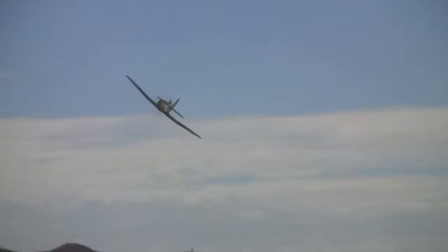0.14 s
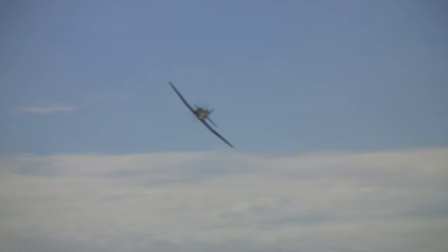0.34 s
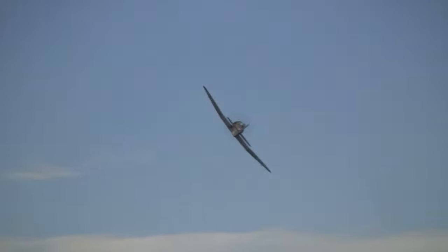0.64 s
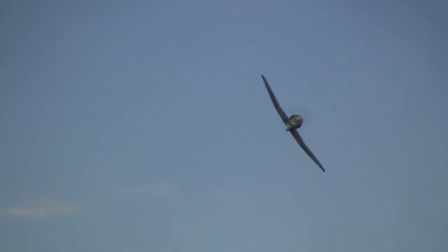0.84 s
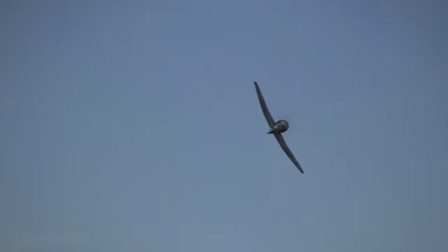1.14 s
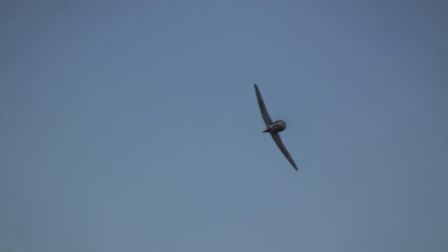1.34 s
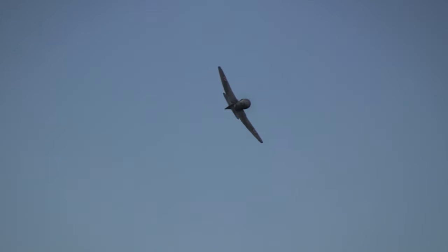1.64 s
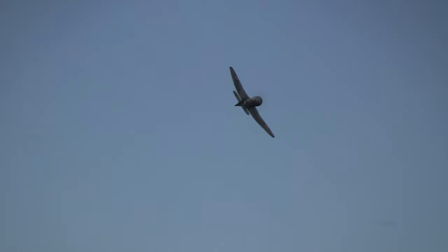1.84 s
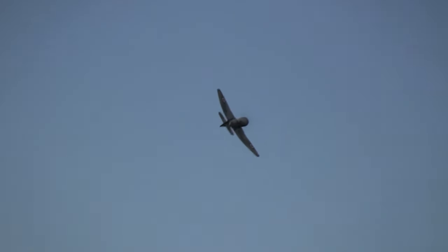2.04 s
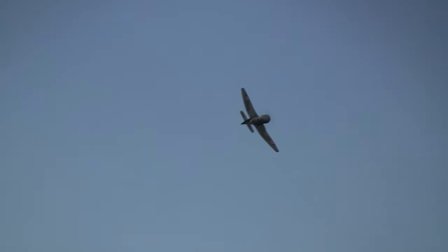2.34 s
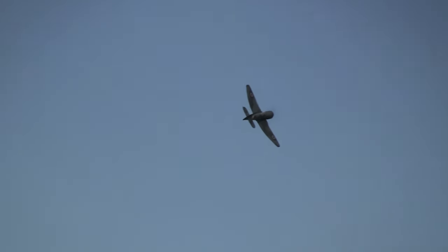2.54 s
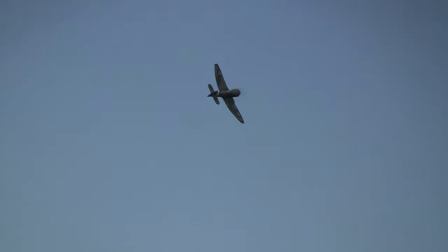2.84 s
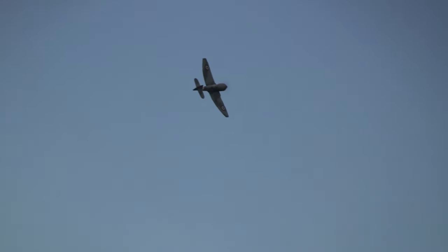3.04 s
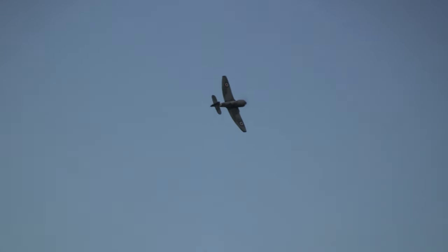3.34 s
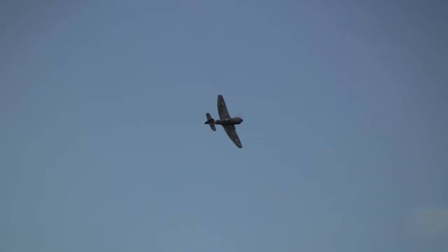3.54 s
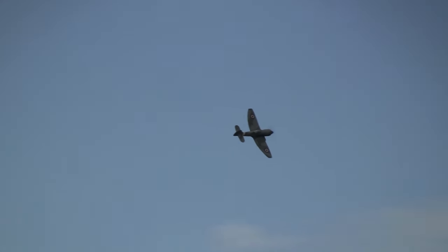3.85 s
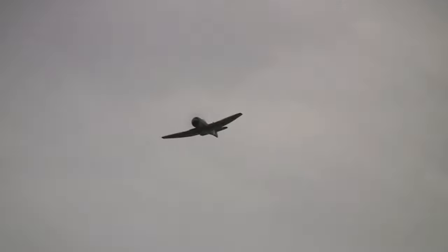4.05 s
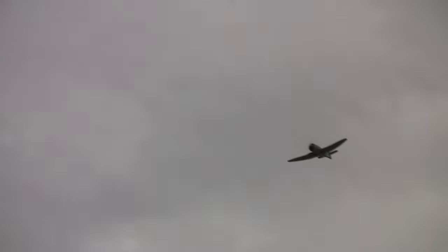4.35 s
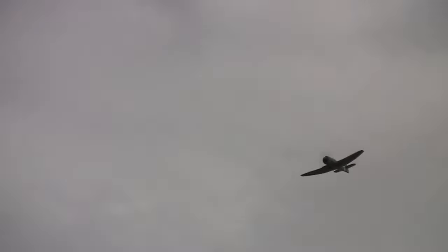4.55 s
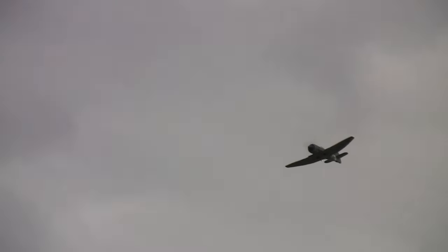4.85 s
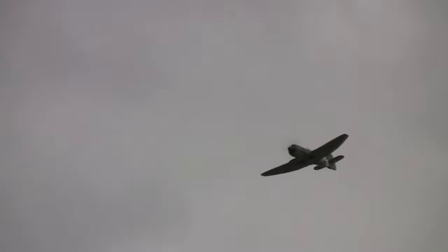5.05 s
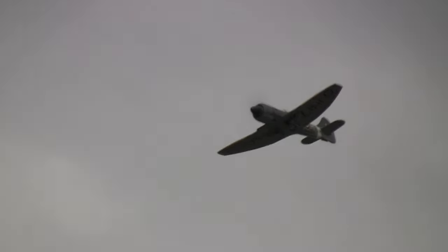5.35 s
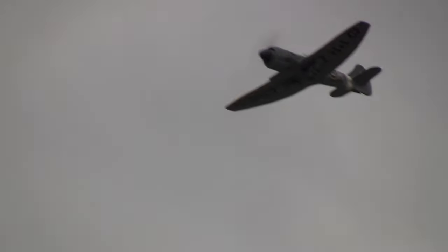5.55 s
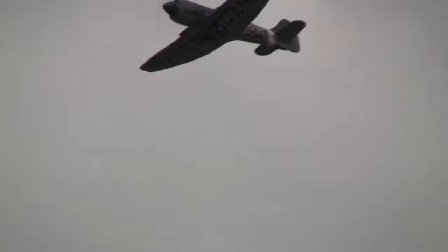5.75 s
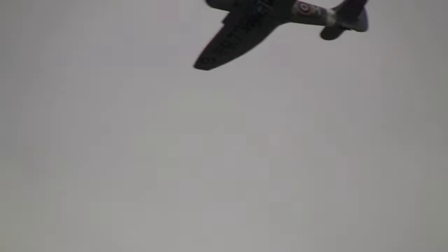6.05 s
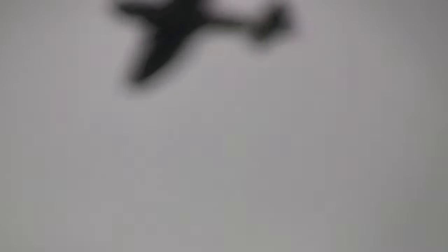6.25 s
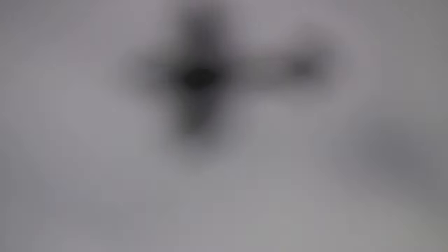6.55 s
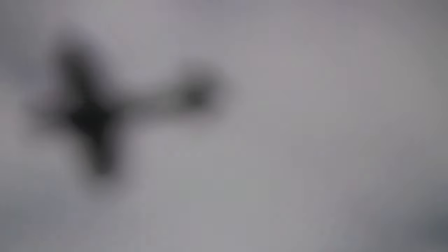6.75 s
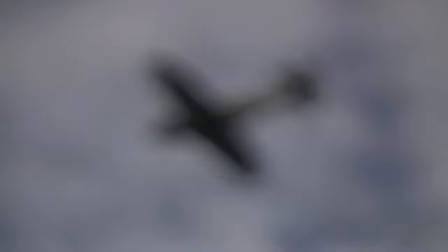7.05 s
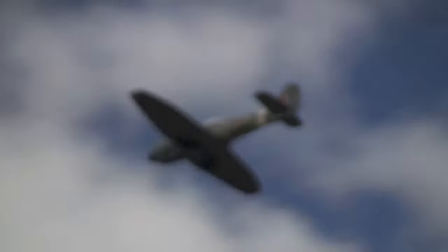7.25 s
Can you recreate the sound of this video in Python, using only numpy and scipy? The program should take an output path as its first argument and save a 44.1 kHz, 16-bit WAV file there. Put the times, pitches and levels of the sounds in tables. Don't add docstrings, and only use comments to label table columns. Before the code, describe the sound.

Raspy piston-engine buzz of a big model plane recedes, camera clicks, a quick fade through silence, then a louder pass sinks in pitch.

```python
import sys
import numpy as np
from scipy import signal
from scipy.fft import rfft, irfft, next_fast_len
from scipy.io import wavfile
from scipy.ndimage import uniform_filter1d, map_coordinates

SR = 44100
rng = np.random.default_rng(int(sys.argv[2]) if len(sys.argv) > 2 else 0)


def wav_out(sig):
    wavfile.write(sys.argv[1], SR, np.round(np.clip(np.atleast_2d(sig).T, -1, 1) * 32767).astype(np.int16))


def makeup_ratio(level_db):
    decades = np.asarray(level_db, float) / 20
    return 10 ** decades


N = 325899
T = np.arange(N) / SR
CUT_S = 4.029

# (time [s], engine cycle rate [Hz], delay of the ground echo [ms])
AWAY_PATH = [(0, 35.45, .99), (.7, 35.05, 1.14), (1.3, 35.0, 1.27), (2.6, 34.96, 1.39), (3.5, 34.97, 1.47),
             (4.1, 34.98, 1.49)]
OVER_PATH = [(4.0, 34.8, 3.2), (4.65, 34.8, 3.74), (4.95, 35.41, 4.08), (5.25, 36.02, 4.45),
             (5.55, 36.31, 4.94), (6.0, 35.7, 5.72), (6.3, 34.46, 6.24), (6.55, 33.42, 6.6),
             (6.75, 32.79, 6.72), (7.0, 32.02, 6.6), (7.25, 31.36, 6.4), (7.4, 31.26, 6.15)]


def level(x, db):
    return x * makeup_ratio(db) / np.sqrt(np.mean(x ** 2))


def curves(table):
    s, *columns = np.transpose(table)
    return [np.interp(T, s, column) for column in columns]


def colour(x, spectrum):
    hz, db = np.transpose(spectrum)
    size = next_fast_len(N + SR // 10)
    f = np.fft.rfftfreq(size, 1 / SR) + 1
    gain = makeup_ratio(np.interp(np.log(f), np.log(hz), db))
    return irfft(rfft(x, size) * gain, size)[:N]


def band(x, lo_hz, hi_hz):
    sos = signal.butter(2, [lo_hz, min(hi_hz, 0.45 * SR)], "band", fs=SR, output="sos")
    return signal.sosfilt(sos, x)


def bump(s, width):
    return np.exp(-((T - s) / width) ** 2)


def walk(rate):
    hop = 32
    k = int(SR / rate / hop)
    steps = np.repeat(rng.standard_normal(N // hop // k + 2), k)
    coarse = uniform_filter1d(uniform_filter1d(steps, k), k)
    return 2.0 * np.interp(np.arange(N) / hop, np.arange(len(coarse)), coarse)


def each(turns):
    return rng.standard_normal(2000)[turns.astype(int)]


def wind():
    # (time [s], hold [s], level [dB], dying away [dB/s])
    gusts = [
        (0, 0.031, -37, 70),
        (0.79, 0.045, -29.5, 402),
        (4.114, 0.047, -21.5, 30),
        (4.396, .08, -22, 120),
        (4.785, 0.16, -21, 130),
        (5.137, 0.66, -24.5, 67),
        (6, 0.036, -23.5, 14),
        (6.8, 0.72, -26.5, 50),
    ]
    # (frequency [Hz], level [dB per Hz])
    field_spectrum = [(40, -21), (65, -11), (85, 2.5), (110, -14), (300, -21), (1000, -24), (3000, -41.5),
                      (6000, -51), (15000, -54), (15700, -63)]
    rise_db_s = 162
    buffets = [np.where(T < CUT_S, -51, -27.5)]
    for s, hold, db, dies in gusts:
        rising = rise_db_s * np.clip(s - T, 0, None)
        dying = dies * np.clip(T - s - hold, 0, None)
        buffets.append(db - rising - dying)
    gust_db = np.max(buffets, axis=0)
    port = band(band(rng.standard_normal(N), 199, 279), 151, 322)
    eddies = makeup_ratio(0.62 * walk(rate=20)) * port
    field = makeup_ratio(0.88 * walk(rate=4.63)) * colour(rng.standard_normal(N), field_spectrum)
    field_db = np.interp(T, [1.2, 3.5], [-3, 1.5])
    return level(eddies, -1.33) * makeup_ratio(gust_db) + level(field, -44) * makeup_ratio(field_db)


def camera():
    # (time [s], peak [dB], ring from [Hz], ring to [Hz], thud [dB], knock over the thud [dB])
    clicks = [
        (.768, -47, 1000, 4030, -29, 8),
        (1.5478, -48, 6900, 13100, -72, 0),
        (1.6285, -8.5, 2550, 7460, -21.5, -1),
        (1.6307, -24, 2600, 6000, -70, 0),
        (2.64, -62, 6000, 9000, -42, 0),
        (2.702, -37, 2500, 3500, -58, 0),
        (2.956, -51, 5500, 11000, -72, 0),
        (3.27, -58, 3500, 5500, -64, 0),
        (5.69, -45, 2022, 4000, -23, -12),
    ]
    length = 4410
    out, t = np.zeros(N + length), np.arange(length) / SR
    for s, db, lo_hz, hi_hz, thud_db, knock_db in clicks:
        crack, knock = rng.standard_normal((2, length))
        ring = level(band(crack, lo_hz, hi_hz), -4.5)
        ring = ring + 0.4 * np.sin(2 * np.pi * 0.86 * lo_hz * t)
        ring = ring + 1.15 * np.sin(2 * np.pi * 1.276 * lo_hz * t)
        ring = ring + 0.67 * np.sin(2 * np.pi * 0.5 * (lo_hz + hi_hz) * t)
        ring = ring + makeup_ratio(db / 2) * 1.8 * crack * np.exp(-t / 0.001)
        decay = np.exp(-t / 0.00076) + 0.2 * np.exp(-t / 0.0017)
        tick = makeup_ratio(db) * ring * (1 - np.exp(-t / 0.00025)) * decay
        rumble = band(band(knock, 100, 390), 60, 800) * np.clip(t / 0.011, 0, 1) ** 2 * np.exp(-t / 0.02)
        body = 0.72 * np.sin(2 * np.pi * 65 * t) + 13 * makeup_ratio(knock_db) * rumble
        thud = makeup_ratio(thud_db) * body * (t / 0.017) ** 2 * np.exp(2 - 2 * t / 0.012)
        start = int(s * SR)
        out[start:start + length] += tick + thud
    return out[:N]


def overtones():
    # (multiple of the cycle, time [s], width [s], level [dB])
    singing = [(45.9, .95, 0.64, -49), (46, 3, 1.1, -59), (49, 1.8, 1.4, -54), (52, 2.6, 1.4, -65),
               (57, 3.6, .9, -56.5), (57, 1.9, .8, -67), (58, 2.2, .7, -66), (56.3, 4.9, .4, -52),
               (56, 4.7, .3, -53), (58, 5.5, .3, -50), (58, 6, .4, -55), (56, 6.85, .2, -46),
               (46.6, 5.2, .15, -46)]
    hz = np.where(T < CUT_S, curves(AWAY_PATH)[0], curves(OVER_PATH)[0])
    cycle = 2 * np.pi * np.cumsum(hz) / SR
    out = 0
    for k, s, width, db in singing:
        out = out + makeup_ratio(db) * bump(s, width) * np.sin(k * cycle + 0.4 * walk(rate=20))
    return out


def whistles(cycle):
    # (time [s], length [s], multiple of the cycle, level [dB])
    tones = [
        (1.354, 0.12, 10, -40),
        (6.623, 0.056, 117.7, -41),
        (6.76, .06, 117.5, -49),
        (7.034, 0.07, 91.6, -38.5),
    ]
    out = 0
    for s, length, k, db in tones:
        shake = 1.1 * min(k / 90, 1) ** 2 * walk(rate=60)
        out = out + makeup_ratio(db) * np.exp(-((T - s) / length) ** 4) * np.sin(k * cycle + shake)
    return out


def cowling(cycle, rattle_db):
    low = level(band(rng.standard_normal(N), 1000, 1180), 1.5) * ((1 - np.cos(cycle / 2 - 0.2)) / 2) ** 5
    strength = makeup_ratio(3.5 * each(cycle / (2 * np.pi) + 0.57))
    knock = strength * ((1 + np.cos(cycle + 0.42)) / 2) ** 3
    high = knock * np.sin(59 * cycle + 1.23 * walk(rate=150)) * makeup_ratio(-0.5)
    return (low + high) * makeup_ratio(rattle_db)


def propeller(cycle, roar_db, treble_db, bass_db, gate, burst):
    # (frequency [Hz], level [dB per Hz])
    roar_spectrum = [(60, -47), (110, -12.5), (180, -8.5), (350, -16.5), (600, -17.5), (1300, -20),
                     (2000, -23.5), (4200, -31), (5900, -38), (7500, -47), (9500, -51.5), (11900, -58),
                     (13500, -58.5), (15700, -63.5)]
    firing = np.cos(5 * cycle) + 0.25 * np.cos(cycle + 0.4)
    firing = firing + 0.18 * each(5 * cycle / (2 * np.pi) + 0.5)
    size = next_fast_len(N)
    noise = rfft(level(colour(rng.standard_normal(N), roar_spectrum), 0), size)
    octave = np.log2(np.fft.rfftfreq(size, 1 / SR) + 1)
    shared, out = walk(rate=7.3), 0
    for hz in 62.5 * 2 ** np.arange(0, 8.5, 0.5):
        share = np.clip(1 - 2 * abs(octave - np.log2(hz)), 0, 1)
        gain_db = treble_db * (min(hz / 5600, 1.8) ** 1.04 - 0.3) + bass_db * (hz < 200)
        depth = gate * np.clip(hz / 3000, 0.5, 1.5)
        puff = np.exp(depth * firing - 0.8 * depth ** 2)
        flicker_db = 0.32 * shared + 0.25 * walk(rate=13)
        out = out + puff * makeup_ratio(gain_db + flicker_db) * irfft(noise * share, size)[:N]
    return out * makeup_ratio(roar_db)


def exhaust(cycle, orders, swells, lobes, turn, weak_db, hum_db, bark_db, rough, burst, hush):
    pipe_late = [(1, -.56), (22, .11), (23, .62), (33, .84), (34, .36), (44, .54)]
    top_order, sub_db_per_order = 44, 10
    hum, bark, wobble = 0, 0, walk(rate=9.9)
    strong = {k: rest for k, *rest in orders}
    first, second = (bump(s, width) for s, width in lobes)
    whole = np.arange(1, top_order + 1)
    late = 2 * np.pi * np.cumsum(np.interp(whole, *np.transpose(pipe_late)))
    for k in sorted({*whole, *strong}):
        sweep = np.interp(k, whole, late) + 32.4
        shake = rough * np.sqrt(k / 19) * walk(rate=20)
        phase = k * (cycle + 0.01 * rough * wobble) - sweep + shake
        faint_db = weak_db - sub_db_per_order * max(4 - k, 0)
        before_db, after_db, first_db, second_db = strong.get(k, [faint_db, faint_db, 0, 0])
        facing_db = before_db + (after_db - before_db) * turn + first_db * first + second_db * second
        for order, s, width, db in swells:
            if order == k:
                facing_db = facing_db + db * bump(s, width)
        partial = -np.sqrt(2) * makeup_ratio(facing_db + 3 * rough * walk(rate=5)) * np.cos(phase)
        if k <= 11:
            hum = hum + partial
        else:
            bark = bark + partial
    bark = bark * (1 + burst * np.cos(cycle)) * (1 + 1.6 * burst * np.cos(cycle / 2 - 0.5))
    bark = bark * (1 - hush * ((1 + np.cos(cycle - 2 * np.pi * 0.65)) / 2) ** 3)
    return hum * makeup_ratio(hum_db) + bark * makeup_ratio(bark_db)


def aircraft(path, flight, turning, beam, orders, swells, lobes, bass_db, weak_db, rough, gate, burst, ground,
             bark_shift_db, rattle_db, hush):
    (hz, lag_ms), (turn,) = curves(path), curves(turning)
    rough, ground, gate = (before + (after - before) * turn for before, after in (rough, ground, gate))
    closest_s, closest_m, speed, near_db, db_per_m, leaving = flight
    along = speed * (T - closest_s)
    metres = np.hypot(closest_m, np.where(along < 0, along, leaving * along))
    roar_db = -3.5 - 20 * np.log10(metres)
    beam_db = []
    for before, after, at, width, lobe_db in beam:
        lobe = np.exp(-((turn - at) / width) ** 2)
        beam_db.append(roar_db + before + (after - before) * turn + lobe_db * lobe)
    hum_db, bark_db = beam_db
    treble_db = near_db + 1.5 * turn - db_per_m * metres
    cycle = 2 * np.pi * (np.cumsum(hz) / SR + 0.3)
    direct = exhaust(cycle, orders, swells, lobes, turn, weak_db, hum_db - 4.5, bark_db + bark_shift_db,
                     rough, burst, hush)
    direct = direct + propeller(cycle, roar_db + 4.5, treble_db, bass_db, gate, burst)
    direct = direct + cowling(cycle, roar_db + rattle_db - 13 * (1 - turn))
    soft = signal.sosfilt(signal.butter(1, 3300, fs=SR, output="sos"), direct)
    echo_ms = lag_ms - 0.035 + 0.012 * walk(rate=30)
    arrival = np.arange(N) - echo_ms * SR / 1000
    echo = ground * map_coordinates(soft, [arrival], order=1, mode="nearest")
    return direct + echo + whistles(cycle)


def scene():
    # (closest time [s], closest distance [m], speed [m/s], treble near by [dB],
    # treble lost [dB/m], share of the speed that leads away afterwards [0-1])
    away_flight = (-0.8167, 7, 46, 6.5, 0.1585, 1)
    over_flight = (6.087, 23.1, 27.5, 7.14, 0.26, 0.39)
    # (time [s], share [0-1])
    away_turn = [(0, 0.5), (.6, 0.08), (1.5, 0.44), (3.6, 0.92)]
    over_turn = [(4.1, 0.01), (5.8, 0.2), (6.4, 0.73), (7.0, 0.96)]
    # (before the turn [dB], after it [dB],
    # lobe at share of the turn [0-1], lobe width [0-1], lobe level [dB])
    away_beam = [(9, 20, 0.41, 0.26, -3.5), (3.5, 10, 0.61, 0.3, 7)]
    over_beam = [(6.5, 11.9, 0.012, 0.047, -6), (-4, 5.9, .01, 0.042, -6)]
    # (multiple of the cycle, before the turn [dB], after it [dB],
    # extra in the first lobe [dB], extra in the second lobe [dB])
    away_orders = [(4, -15.5, -13.5, 7.5, -6), (5, 2.5, 3, -2, -1), (6, -28.5, -11, -3, -1),
                   (7, -12.5, 3.5, -2.5, 0), (10, -3, -13, 0, -2), (12, -5.5, -12.5, -11, -2.5),
                   (13, -13, -18.5, 6, 7), (14, -17, -46, 3, 7), (15, -7, -6, -6, 1.5),
                   (16, -20, -7, -3, -3), (17, 3, -18, -0.5, -1), (18, -49, -16, -8, -4),
                   (19, -5.5, -7, -1, 1), (20, -16, -4, -17, 0.5), (21, -21.5, -20, -6, 7.5),
                   (22, -19.5, -12, -2, -7), (23, -31, -2.5, -3, 3), (24, -40, -0.5, 8.5, -4),
                   (25, -15, -24, 2, 3.5), (26, -9, -34, 9.5, -3), (27, -7, -37, 8, -2),
                   (28, -8.5, -17, 3.5, 1.5), (29, -23, -40, -5, 7), (30, -11.5, -36, 6, -6),
                   (31, -26, -36, 0, 13), (32, -15, -32, 3, -2.5), (33, -25, -21.5, -4, 4),
                   (34, -17, -24.5, 0, -2.5), (35, -27, -20, -2, 1), (36, -23, -17, 0, -4),
                   (37, -30, -18, -3, 0), (38, -39, -12, -10, -7), (40, -39, -17, -5, -4),
                   (41, -42, -9, -4, 2), (42, -33, -21, 8, -1)]
    over_orders = [(3, -14.5, -22, 2, -6), (4, -4.5, -13, -5, -1), (4.5, -8, -19.5, -8, -3),
                   (5.002, 2.5, -0.1, 1, 1), (5.483, -7.5, -9, -3, 1.5), (7, -2, -4, -15, -2),
                   (8, -16.5, -0.5, -1, 1), (10, -21, -11, 12, 1.5), (12, -12.5, -3.5, 1, 5.5),
                   (14, -20, -18, 0.5, 8.5), (15, -21, -13.5, 6.5, 5), (16, -18, -7.5, -1, 6),
                   (17, -17, -13, 0, 4), (18, -27, -25, -4, 8), (20, -15.5, -9.5, 1, 3),
                   (21, -26, -12.5, 2, 4), (22, -4.5, -12, 8, 3), (24, -26, -11.5, 9, 2),
                   (25, -11, -7.5, 13.5, 3), (26, -7.5, -21, 7, 9), (27, -18.5, -14.5, 11, 6),
                   (28, -27, -22.5, 2, 9), (29, -14, -15, -10, -6), (30, -4.5, -17, -3, -5),
                   (31, -6, -13, -6, 1), (32, -1, -6.5, 2, -7), (33, -20, -13, 10, 1),
                   (34, -5.5, -19, 3, -4), (35, -11.5, -11, -2, 6), (37.86, -19, -7, 1, 2.5),
                   (38.9, -8.5, -15, 0, 8), (39.9, -20, -12, -4, 1), (43.3, -30, -14, 0, 0)]
    # (multiple of the cycle, time [s], width [s], level [dB])
    away_swells = [(6, .2, .3, 4), (6, 2.5, .6, 7), (7, 0.61, .4, -8), (7, 2.3, 0.43, 2), (16, .6, .5, 2),
                   (16, 2, .4, -6), (17, 3.5, 0.65, 4.5), (19, 1.95, .3, 2), (19, 3.75, .3, -7),
                   (20, 1.95, 0.33, 3.5), (20, 3.5, .3, -6), (21, 2.5, 0.66, -13), (23, .4, .7, 10),
                   (27, 1.9, .6, 7), (28, 2.7, 0.38, -6), (32, 2.2, .5, 7), (33, 2.2, .4, 7),
                   (36, 1.9, .6, -13)]
    over_swells = [(4, 6.55, .2, 3.5), (8, 4.8, .2, -7), (8, 7.14, 0.28, 3.5), (11, 5.9, 0.27, 9),
                   (13, 7.05, .35, 10), (15, 6.6, .6, 1), (15, 6.4, .3, -9), (23, 6.5, .3, 3),
                   (24, 5, .8, 3), (24, 6, .15, -4), (25, 6, .25, -7), (25, 7, .15, -8), (27, 6, .2, 9),
                   (31, 5.86, 0.33, -5), (31, 7.2, .2, -4), (32, 4.8, 0.6, -7), (33, 4.7, .2, 7),
                   (35, 5.9, 0.24, 4.5), (39, 6.25, .2, -8)]
    # (time [s], width [s])
    away_lobes = [(0, 0.57), (1.2, 0.4)]
    over_lobes = [(4.1, 0.61), (6.35, 0.29)]
    away = aircraft(AWAY_PATH, away_flight, away_turn, away_beam, away_orders, away_swells, away_lobes,
                    bass_db=-4.5, weak_db=-41, rough=(0.33, 0.27), gate=(0.17, 0.17), burst=0.12,
                    ground=(0.6, 0.7), bark_shift_db=-3.5, rattle_db=-19, hush=0.42)
    over = aircraft(OVER_PATH, over_flight, over_turn, over_beam, over_orders, over_swells, over_lobes,
                    bass_db=-0.5, weak_db=-32, rough=(0.18, 0.2), gate=(0.18, 0.33), burst=0.08,
                    ground=(0.93, 0.52), bark_shift_db=-5.5, rattle_db=-1, hush=0)
    passes = np.where(np.arange(N) < CUT_S * SR, away, over)
    return (passes + wind() + camera() + overtones())[None]


def low_pass(x):
    return signal.sosfilt(signal.butter(12, 15780, fs=SR, output="sos"), x)


def record(dry):
    # (frequency [Hz], level [dB])
    mic = [(3200, -1), (3900, 0), (4800, -2), (5500, -1), (6300, 1), (7500, 0), (8300, 1.5), (9500, -1.5),
           (11000, 0.5), (11850, 0.5), (12600, -1.5), (13300, .5), (14300, -4), (15200, -2)]
    fade_s, end_fade_s = 0.097, 0.019
    heard = colour(dry[0], mic)[None]
    heard = signal.sosfilt(signal.butter(3, 62, "high", fs=SR, output="sos"), heard)
    heard = signal.sosfilt(signal.ellip(8, 0.2, 70, 15750, fs=SR, output="sos"), heard)
    fade = np.clip(abs(T - CUT_S) / fade_s, 0, 1)
    fade = fade * np.clip((N / SR - T) / end_fade_s + 0.5, 0, 1)
    return low_pass(heard * fade)


dry = scene()
out = record(dry)
wav_out(out)
```